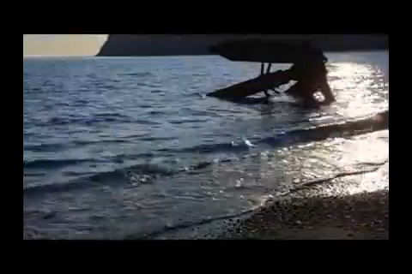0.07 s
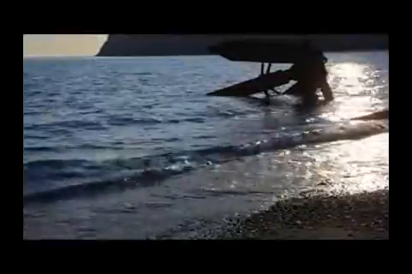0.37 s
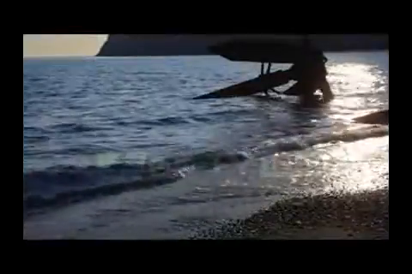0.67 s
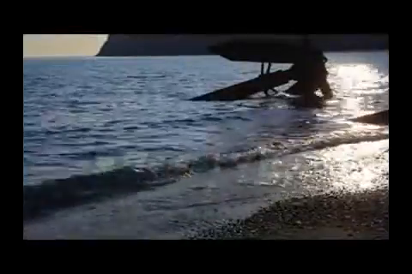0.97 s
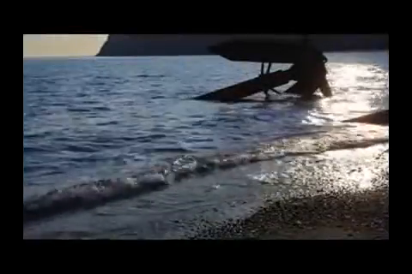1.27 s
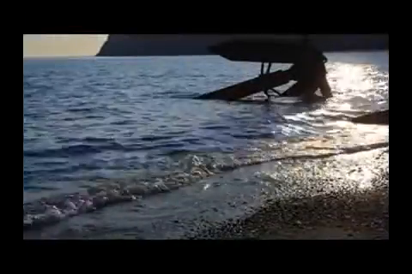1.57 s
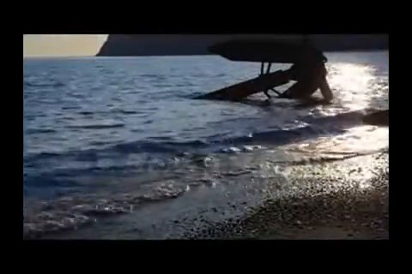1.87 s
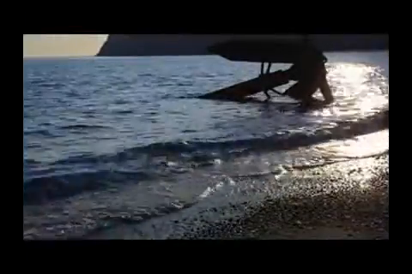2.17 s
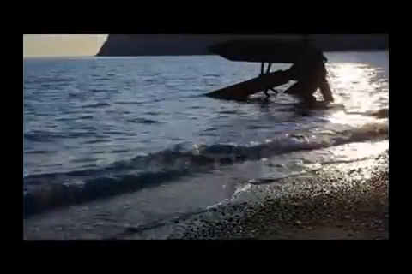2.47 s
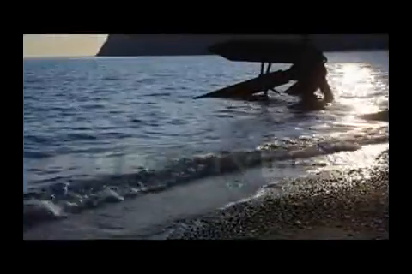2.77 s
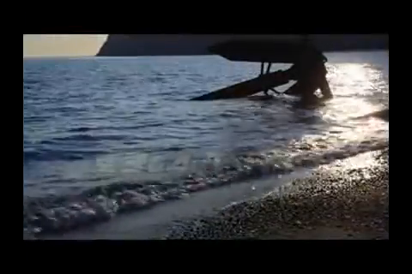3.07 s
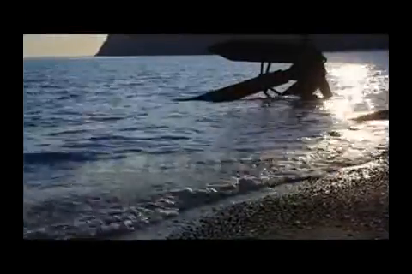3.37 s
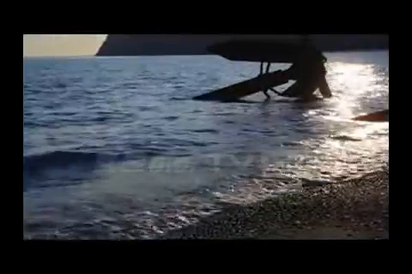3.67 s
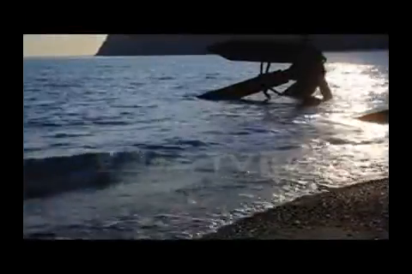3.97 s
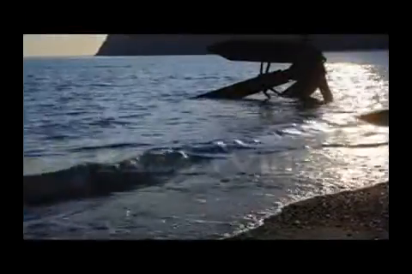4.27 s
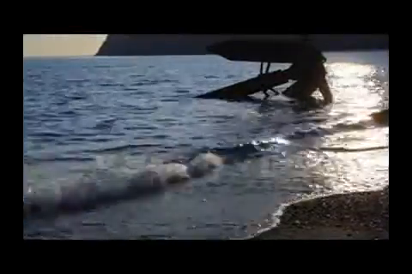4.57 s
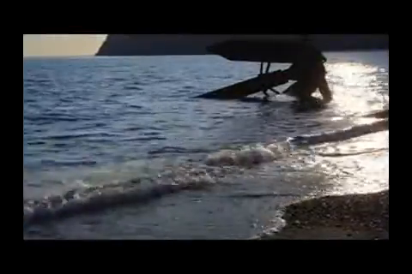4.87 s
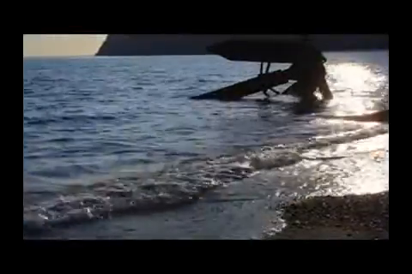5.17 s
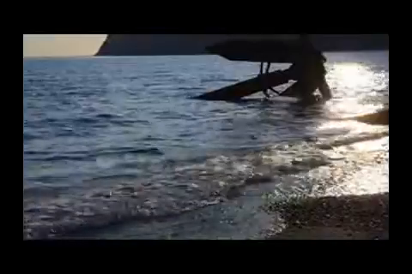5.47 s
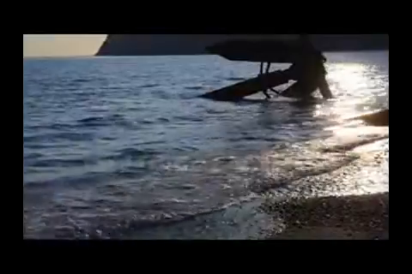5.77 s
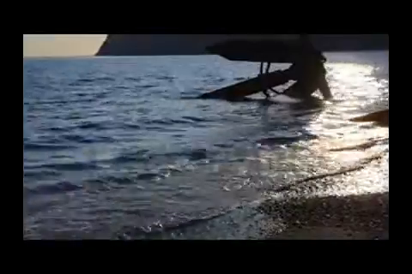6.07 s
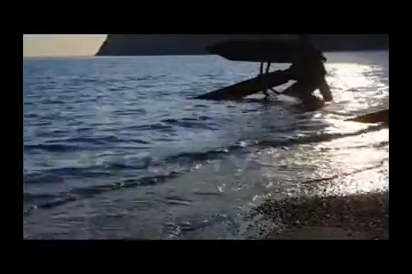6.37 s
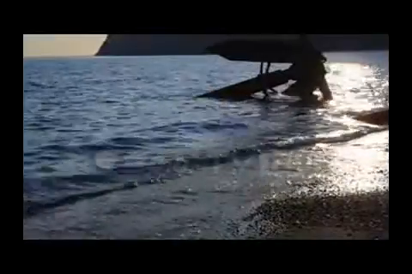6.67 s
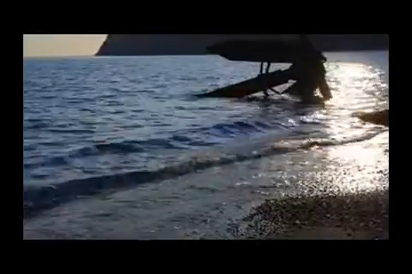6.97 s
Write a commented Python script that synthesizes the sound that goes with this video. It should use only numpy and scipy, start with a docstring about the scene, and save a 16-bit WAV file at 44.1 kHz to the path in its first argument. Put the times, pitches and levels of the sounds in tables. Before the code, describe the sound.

Small waves break, bubble and fizz on a pebble beach close by, while gusts of wind rumble and thump on the microphone.

```python
"""Small waves break on a pebble beach, about one every two seconds, a few steps from a mono microphone.
Each crest spills, rolls over and traps air that rings as bubbles: spray fizzes first, then mid-sized
bubbles churn and big ones gurgle. One wave runs far up and seethes through the pebbles.
Single bubbles plop and drops splash close by. Gusts of wind rumble and thump on the microphone,
and the open sea hisses behind it all."""
import sys
import numpy as np
from scipy import signal
from scipy.fft import rfft, irfft, next_fast_len
from scipy.io import wavfile
from scipy.ndimage import uniform_filter1d, minimum_filter1d

SR = 44100
rng = np.random.default_rng(int(sys.argv[2]) if len(sys.argv) > 2 else 0)


def bounce(signal):
    """Save signal as a 16-bit WAV file at the path given by the first command-line argument."""
    frames = np.transpose(np.atleast_2d(signal))
    limited = np.clip(frames, -1, 1)
    pcm = np.round(limited * 32767).astype(np.int16)
    wavfile.write(sys.argv[1], SR, pcm)


N = 309582
TIME = np.arange(N) / SR

# Stretches of crest that tumble over, building up until start_s. Levels in all tables are relative.
# Columns: start_s, end_s, rise_db_per_s, churn_db, gurgle_db, fizz_db
CRESTS = [(0.076, 0.22, 70, -35, -36, -31.5), (0.49, 0.56, 35, -34.5, -34, -32.5),
          (0.77, 0.885, 35, -30.5, -37, -36), (1.065, 1.48, 28, -27, -32.5, -24),
          (1.9, 2.04, 15.5, -31.5, -35, -34.5), (2.22, 2.374, 44, -30.5, -34, -29),
          (2.71, 2.784, 33, -27, -34.5, -23.5), (3.024, 3.078, 21.5, -25, -26, -22.5),
          (4.0, 4.103, 46, -40.5, -46.5, -33), (4.272, 4.38, 153, -34.5, -47, -25.2),
          (4.739, 5.176, 34, -24.5, -27, -22.5), (5.554, 5.746, 148, -37.3, -56, -35.5),
          (6.673, 6.734, 88, -29, -38.5, -26.5), (6.887, 7.022, 80, -24, -30, -24.5)]
# Tone of fast-swirling air at the microphone. Columns: pitch_hz, level_db
FLUTTER_TONE = [(30, -36), (100, 0), (160, 4), (240, 0.5), (380, -5), (550, -10.5), (900, -22.5),
                (2500, -58)]


def breaking_waves():
    """Crests trap bubbles of three sizes; the bigger they are, the lower and later they sound."""
    # Tones of the big, mid-sized and tiny bubbles. Columns: pitch_hz, level_db
    gurgle_tone = [(100, -21), (220, -4), (400, -0.5), (600, -1), (900, 2.5), (1200, -2), (1800, -26),
                   (4000, -50)]
    churn_tone = [(500, -7.5), (900, -10), (1200, -3), (1800, -2), (2400, -5.5), (3200, -12), (4500, -9.5),
                  (8000, -25), (16000, -45)]
    fizz_tone = [(1200, -47), (2200, -5), (3200, -1), (4500, -1), (6100, 0.5), (7500, -2.5), (10000, -8),
                 (16000, -12)]
    churns, gurgles, fizzes = np.transpose(CRESTS)[3:]
    gurgle_db = wave_level(gurgles, lag_s=0.02, growth_db_per_s=0, foam_db=-12.5,
                           foam_fall_db_per_s=23.5, lapping_db=-51.5, restless_db=0.7)
    churn_db = wave_level(churns, lag_s=0.01, growth_db_per_s=-2, foam_db=-2.5,
                          foam_fall_db_per_s=29, lapping_db=-50.5, restless_db=0.4)
    fizz_db = wave_level(fizzes, lag_s=0, growth_db_per_s=-2.5, foam_db=-10,
                         foam_fall_db_per_s=9.5, lapping_db=-41, restless_db=0.42)
    gurgle = bubble_cloud(gurgle_db + 2, gurgle_tone, far_froth(patchy_db=1.5, flicker_db=1.64),
                          near_bubbles(447.3, 1394, per_s=250, cycles=4.55, spread_db=2), near_db=-17)
    churn = bubble_cloud(churn_db + 2, churn_tone, far_froth(patchy_db=1, flicker_db=1),
                         near_bubbles(1012, 4280, per_s=800, cycles=5.1, spread_db=2.5), near_db=-10)
    fizz = bubble_cloud(fizz_db + 2, fizz_tone, far_froth(patchy_db=0.5, flicker_db=1),
                        near_bubbles(2490, 15470, per_s=700, cycles=3, spread_db=1), near_db=-6.5)
    return gurgle + churn + fizz


def wave_level(crests_db, lag_s, growth_db_per_s, foam_db, foam_fall_db_per_s, lapping_db, restless_db):
    """Level in dB of one bubble size: crests build, roll, collapse and leave foam, over soft lapping."""
    levels = [lapping_db]
    for (start, end, rise, *_), db in zip(CRESTS, crests_db):
        rolling_db = db + growth_db_per_s * (np.clip(TIME, start, end) - (start + end) / 2)
        levels.append(rolling_db + rise_and_fall(start + lag_s, end, rise, fall_db_per_s=64))
        levels.append(db + foam_db + rise_and_fall(end, end, rise, foam_fall_db_per_s))
    return combined_db(levels) + restless_db * wander(9.7)


def bubble_cloud(level_db, tone, far, near, near_db):
    """Far froth and near bubbles share one tone and swell and fade together."""
    return gain_of(level_db) * unit_level(with_tone(far + gain_of(near_db) * near, tone))


def far_froth(patchy_db, flicker_db):
    """Countless far bubbles merge into a hiss that comes in clumps of like size and in brief spurts."""
    shape = (N // 128 + 5, 257)  # a grid of moments by pitches
    real, imaginary, clumps = rng.standard_normal((3, *shape))
    for _ in range(2):  # blur across time and pitch
        clumps = uniform_filter1d(uniform_filter1d(clumps, size=7, axis=0), size=8, axis=1)
    grid = (real + 1j * imaginary) * gain_of(patchy_db * unit_level(clumps))
    hiss = signal.istft(grid.T, nperseg=512, noverlap=384)[1][:N]
    return unit_level(hiss * gain_of(flicker_db * wander(55)))


def near_bubbles(low_hz, high_hz, per_s, cycles, spread_db, sizes=28):
    """Near bubbles of many sizes ring at random moments; spread_db makes a few louder than the rest."""
    out = np.zeros(N)
    chance, loudness, size_draw = rng.random((3, N))
    pops = np.flatnonzero(chance < per_s / SR)
    for size, hz in enumerate(np.geomspace(low_hz, min(high_hz, SR / 3), sizes)):
        starts = pops[(size_draw[pops] * sizes).astype(int) == size]
        strength = gain_of(spread_db * np.minimum(-np.log(loudness[starts] + 1e-9), 3))
        ring = hz * bubble(hz, cycles, rise=0.029)  # equal energy per Hz at every size
        positions = starts[:, None] + np.arange(len(ring))
        out += np.bincount(positions.ravel(), np.outer(strength, ring).ravel(), N)[:N]
    return unit_level(out)


def bubble(hz, cycles, rise):
    """A trapped bubble rings and fades, rising in pitch as it nears the surface."""
    age = np.arange(int(5 * cycles * SR / hz) + 2) * hz / SR / cycles
    phase = 2 * np.pi * cycles * (age + rise * age ** 2 / 2)
    ring = np.sin(phase) * np.exp(-age) * (1 - np.exp(-8 * age))
    return ring / (abs(ring).max() + 1e-9)


def pebble_wash(start_s=3.346, end_s=3.876, peak_db=-25.5):
    """A thin sheet of water runs up the beach and drives air out from between dry pebbles."""
    # Tone of the escaping air. Columns: pitch_hz, level_db
    pebble_tone = [(700, -24.5), (1300, -5), (1900, 1.5), (2700, 1.5), (3500, -1), (5000, -4.5),
                   (6500, -5.5), (9000, -22), (16000, -36)]
    level_db = peak_db + rise_and_fall(start_s, end_s, rise_db_per_s=75, fall_db_per_s=59)
    return bubble_cloud(level_db, pebble_tone, far_froth(patchy_db=2, flicker_db=1),
                        near_bubbles(1525, 5130, per_s=2000, cycles=8.8, spread_db=0), near_db=-14)


def plops(gain_db=-1):
    """Single bubbles ring close by and stand out of the wash."""
    # One bubble a row. Columns: start_s, pitch_hz, level_db
    single_bubbles = [(1.537, 1560, -15), (1.725, 1450, -16), (1.982, 934, -18.5), (4.031, 890, -23.5),
                      (4.033, 1760, -17.5), (4.085, 1110, -24), (4.165, 2350, -22), (5.534, 4220, -17),
                      (6.132, 1390, -29), (6.168, 4392, -23.5), (6.175, 1950, -29), (6.468, 2100, -29),
                      (6.504, 2880, -25), (6.56, 1430, -27), (6.593, 1205, -22.5)]
    out = np.zeros(N)
    for start, hz, db in single_bubbles:
        add(out, start, gain_of(db + gain_db) * bubble(hz, cycles=7, rise=0.044))
    return out


def spray_drops(gain_db=-2, slap_gain=0.95, slap_fade_s=0.0028):
    """A drop lands with a tiny sharp slap and leaves one small ringing bubble."""
    # Drops hitting the water close by. Columns: start_s, level_db, pitch_hz
    landings = [(1.46, -16, 6290), (1.5209, -11, 7850), (1.6924, -16, 5860), (2.7534, -12, 5940),
                (3.3338, -13.5, 5800), (4.2692, -11, 7000), (4.751, -9.5, 5600), (5.3205, -15, 6300),
                (6.877, -11, 5340), (6.8934, -15, 4900)]
    out, t = np.zeros(N), np.arange(600) / SR
    for start, db, hz in landings:
        splash = cut_lows(rng.standard_normal(len(t)), 0.64 * hz)
        slap = slap_gain * unit_level(splash) * np.exp(-t / slap_fade_s)
        add(out, start, gain_of(db + gain_db) * slap)
        add(out, start, gain_of(db + gain_db) * bubble(hz, cycles=8, rise=0.022))
    return out


def wind_level(breeze_db=-42.5):
    """Strength of the wind in dB: gusts rise quickly, hold and die back to a light breeze."""
    # Gusts at full strength. Columns: start_s, end_s, level_db
    gusts = [(0.038, 0.374, -22), (0.485, 0.651, -17.5), (0.985, 1.032, -21), (1.273, 1.454, -25),
             (2.028, 2.03, -26), (2.244, 2.62, -20.5), (2.827, 2.88, -23), (2.95, 3.192, -16.5),
             (3.346, 3.53, -21), (3.77, 3.956, -21.5), (4.11, 4.47, -25), (4.54, 4.762, -21.5),
             (4.924, 5.01, -45), (5.27, 5.29, -37), (5.653, 5.74, -32), (5.85, 6.017, -30),
             (6.46, 6.73, -34), (6.916, 6.964, -26.5)]
    levels = [db + rise_and_fall(start, end, rise_db_per_s=124, fall_db_per_s=53)
              for start, end, db in gusts]
    return combined_db([breeze_db] + levels)


def wind_rumble(gust_db, rumble_db=-1, flutter_db=-9.5, puffs_per_s=24, uneven=0.45, calm_db=-20):
    """Air peels off the microphone's body in uneven puffs; stronger gusts hold more fast flutter."""
    # Tone of the deep rumble. Columns: pitch_hz, level_db
    rumble_tone = [(10, -40), (22, -41), (40, -6.5), (75, -1.5), (130, -2.5), (200, -9), (300, -18.5),
                   (500, -38.5), (1500, -93)]
    pace = puffs_per_s * np.exp(uneven * wander(36))
    puffs = np.sin(2 * np.pi * np.cumsum(pace) / SR) + uneven * np.minimum(wander(26.6), 2)
    rumble = unit_level(with_tone(rng.standard_normal(N) * gain_of(5.5 * puffs), rumble_tone))
    flutter = unit_level(with_tone(rng.standard_normal(N) * gain_of(8 * puffs), FLUTTER_TONE))
    steep_gust_db = calm_db + 3.56 * (gust_db - calm_db)
    return gain_of(gust_db + rumble_db) * rumble + gain_of(steep_gust_db + flutter_db) * flutter


def wind_thumps(gust_db, gain_db=-2, rough_gain=0.065, rough_s=0.011):
    """Swirls of air push or suck at the microphone, each wrapped in a short burst of flutter."""
    # The strongest swirls. Columns: peak_s, level_db, pitch_hz
    big_swirls = [(0.098, -3.5, 130), (0.125, -4, 190), (0.202, -0.5, 181), (0.224, -4, 180),
                  (0.272, -2, 180), (0.397, -3.5, 220), (0.477, 6, 212), (0.492, -2, 186), (0.552, -3, 300),
                  (0.657, -2.5, 120), (0.993, -8, 127), (1.069, -10, 142), (1.34, -6.5, 115),
                  (2.03, -12.5, 101), (2.196, -9.5, 218), (2.437, 2, 137), (2.819, -3, 285),
                  (2.844, 0, 278), (2.888, 3, 317), (2.976, 3, 141), (3.01, -4, 232), (3.027, 1, 315),
                  (3.055, 0, 191), (3.122, -4, 170), (3.147, 6, 158), (3.191, 6.5, 167), (3.322, 2.5, 221),
                  (3.688, -6.5, 176), (3.828, -3.5, 140), (4.202, -10, 210), (4.288, -12, 153),
                  (4.359, -11, 173), (4.594, -4.5, 119), (4.967, -8, 190), (5.444, -16, 154),
                  (5.809, -13.5, 177), (5.973, -10, 150), (5.986, -15, 180), (6.14, -17.5, 163),
                  (6.442, -13.5, 117), (6.586, -13, 118), (6.73, -12, 243), (6.948, -14, 150)]
    out = np.zeros(N)
    flutter = unit_level(with_tone(rng.standard_normal(N), FLUTTER_TONE))
    swirls = [*big_swirls, *small_swirls(gust_db)]
    for (peak_s, db, hz), sign in zip(swirls, rng.choice([-1, 1], len(swirls))):
        thump = swirl_thump(hz)
        t = (np.arange(len(thump)) - len(thump) / 2) / SR
        burst = np.interp(peak_s + t, TIME, flutter) * np.exp(-(t / rough_s) ** 2 / 2)
        add(out, peak_s + t[0], gain_of(db + gain_db) * (sign * thump + rough_gain * burst))
    return out


def swirl_thump(hz, sharpness=0.72, swing=0.74):
    """A spike of pressure and a swing back; the smaller the swirl, the quicker both are."""
    t = np.arange(-1536, 1536) / SR
    spike = signal.windows.tukey(len(t)) / (1 + (2 * np.pi * sharpness * hz * t) ** 2)
    thump = cut_lows(spike, swing * hz)
    return thump / abs(thump).max()


def small_swirls(gust_db, level_db=-11.5, spread_db=3, pitch_hz=150, usual_wind_db=-22, count=64):
    """Lesser swirls, harder and quicker in stronger wind, as rows of peak_s, level_db, pitch_hz."""
    time_draw, level_draw, pitch_draw = rng.uniform(-1, 1, (count, 3)).T
    peak_s = (np.arange(count) + 1 + time_draw / 2) * TIME[-1] / (count + 1)
    force_db = np.interp(peak_s, TIME, gust_db) - usual_wind_db
    octaves = 0.14 * pitch_draw + 0.035 * force_db
    return np.transpose([peak_s, level_db + force_db + spread_db * level_draw, pitch_hz * 2 ** octaves])


def far_sea(level_db=-39):
    """The open water hisses evenly behind the waves."""
    # Tone of the sea and far shore, with the microphone's own hiss. Columns: pitch_hz, level_db
    sea_tone = [(60, -6), (250, -22), (600, -28), (1100, -6), (2500, -24), (4500, -5), (6500, 12),
                (9000, 5), (12000, 5.5), (16000, 4)]
    return gain_of(level_db) * unit_level(with_tone(rng.standard_normal(N), sea_tone))


def gain_of(db):
    """Turns decibels into a number to multiply by."""
    return 10 ** (np.asarray(db) / 20)


def unit_level(x):
    """Scales a signal so its average power is 1."""
    return x / np.sqrt(np.mean(x ** 2) + 1e-20)


def combined_db(levels_db):
    """The level in dB of several unrelated sounds at once."""
    return 10 * np.log10(sum(gain_of(db) ** 2 for db in levels_db) + 1e-20)


def rise_and_fall(start_s, end_s, rise_db_per_s, fall_db_per_s):
    """A level in dB that climbs to 0 by the start, holds until the end and falls away."""
    return -rise_db_per_s * np.maximum(start_s - TIME, 0) - fall_db_per_s * np.maximum(TIME - end_s, 0)


def wander(rate_hz):
    """A smooth random wobble, mostly slower than the given rate."""
    size = next_fast_len(N)
    hz = np.fft.rfftfreq(size, 1 / SR)
    spectrum = rfft(rng.standard_normal(size)) * np.exp(-(hz / rate_hz) ** 2) * hz / (hz + 3)
    return unit_level(irfft(spectrum, size)[:N])


def with_tone(x, tone):
    """Turns each pitch up or down along a curve of (pitch_hz, level_db) points."""
    size = next_fast_len(N + 4096)
    hz = np.fft.rfftfreq(size, 1 / SR)
    pitch_hz, level_db = np.transpose(tone)
    curve_db = np.interp(np.log(hz + 1), np.log(pitch_hz + 1), level_db)
    return irfft(rfft(x, size) * gain_of(curve_db), size)[:N]


def cut_lows(x, hz):
    """Weakens everything below a pitch."""
    return signal.lfilter(*signal.butter(2, hz, "highpass", fs=SR), x)


def add(mix, start_s, sound):
    """Mixes a sound in at a given time."""
    part = mix[max(round(start_s * SR), 0):][:len(sound)]
    part += sound[:len(part)]


def scene():
    """Water and wind at one microphone, the same in both channels."""
    water = breaking_waves() + pebble_wash() + plops() + spray_drops() + far_sea()
    gust_db = wind_level()
    return np.tile(water + wind_rumble(gust_db) + wind_thumps(gust_db), (2, 1))


def record(dry, top_hz=15800):
    """The microphone dulls the highs, a limiter turns down the hardest thumps, and the very top is cut."""
    # How well the microphone hears each pitch. Columns: pitch_hz, level_db
    microphone_tone = [(20, -1), (7300, 0), (8600, -1), (10000, -5), (11200, -13.5), (12500, -16),
                       (14000, -16), (15700, -20)]
    heard = np.array([with_tone(channel, microphone_tone) for channel in dry])
    allowed_gain = 1 / np.maximum(abs(heard).max(axis=0), 1)
    smooth_gain = uniform_filter1d(minimum_filter1d(allowed_gain, size=129), size=129)
    top_cut = signal.firwin(511, top_hz, window=("kaiser", 9), fs=SR)
    return signal.oaconvolve(heard * smooth_gain, top_cut[None], "same")


dry = scene()
out = record(dry)
bounce(out)
```